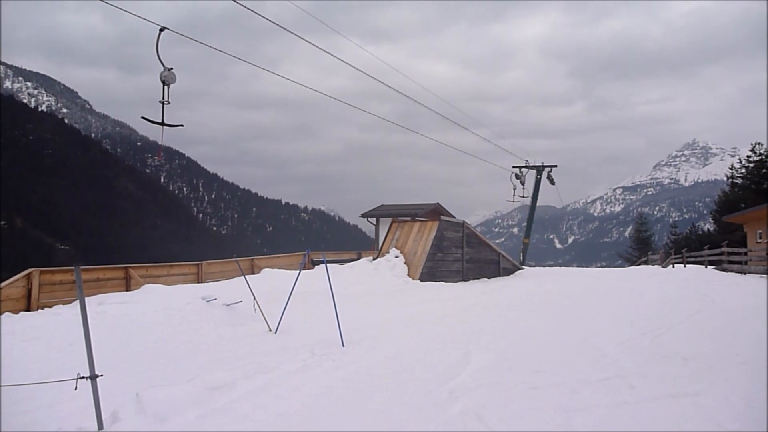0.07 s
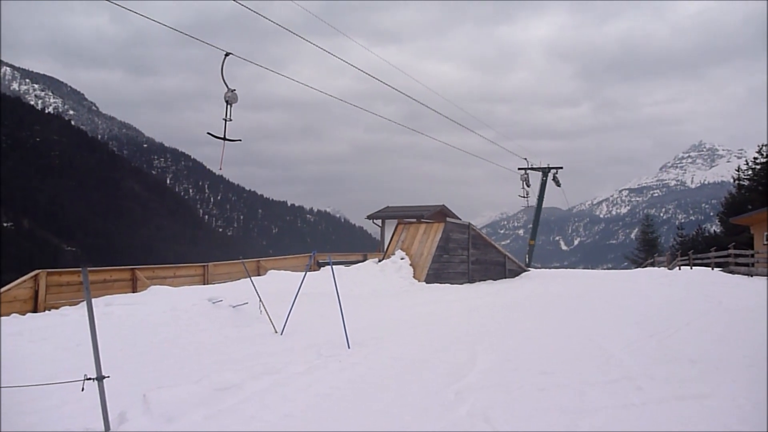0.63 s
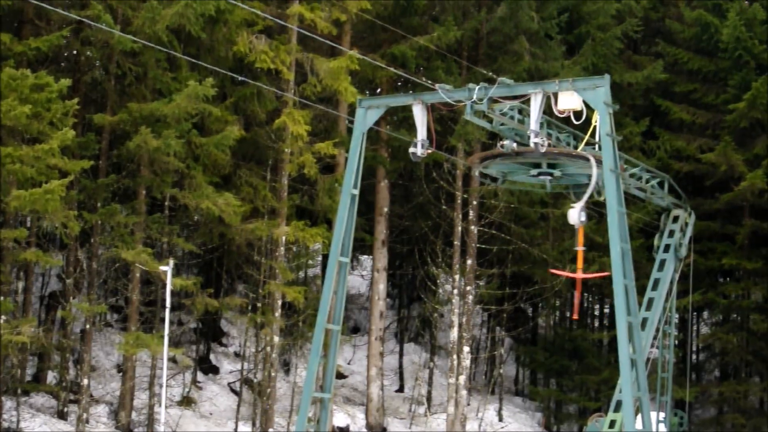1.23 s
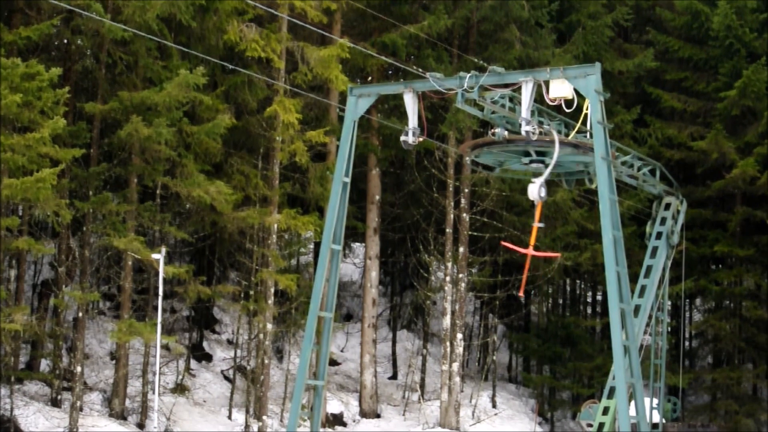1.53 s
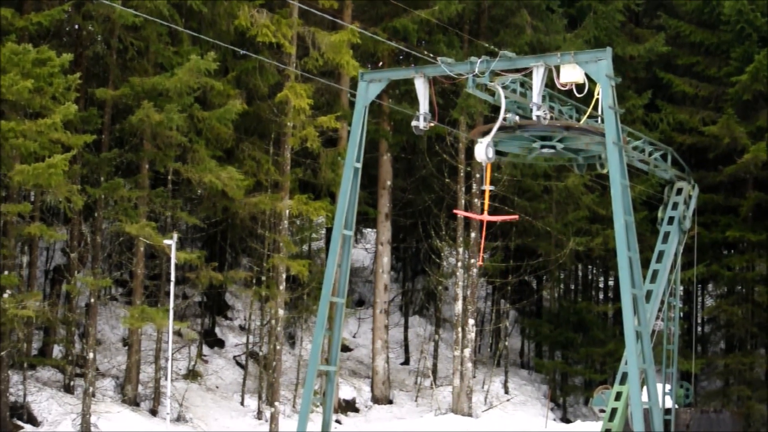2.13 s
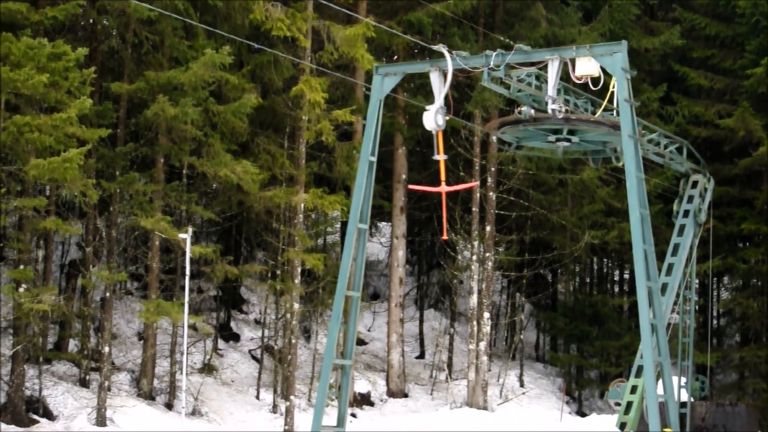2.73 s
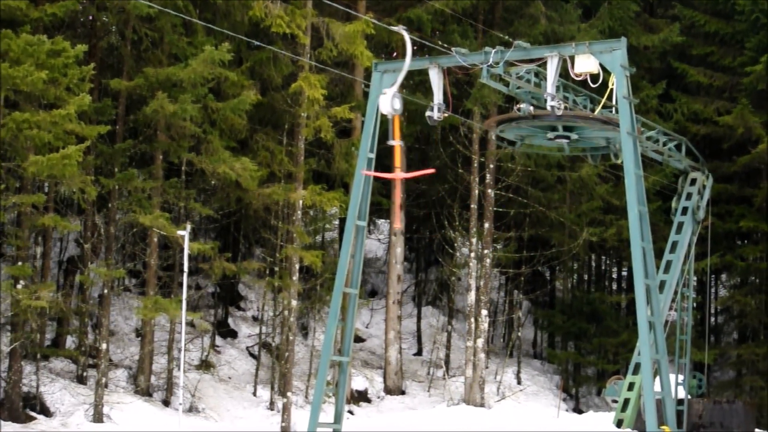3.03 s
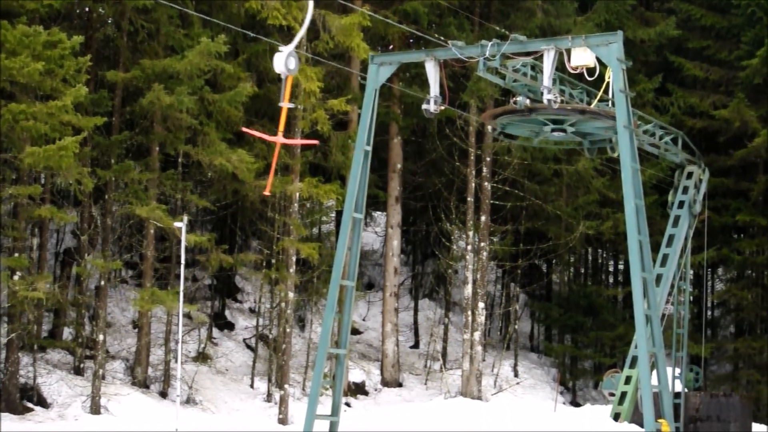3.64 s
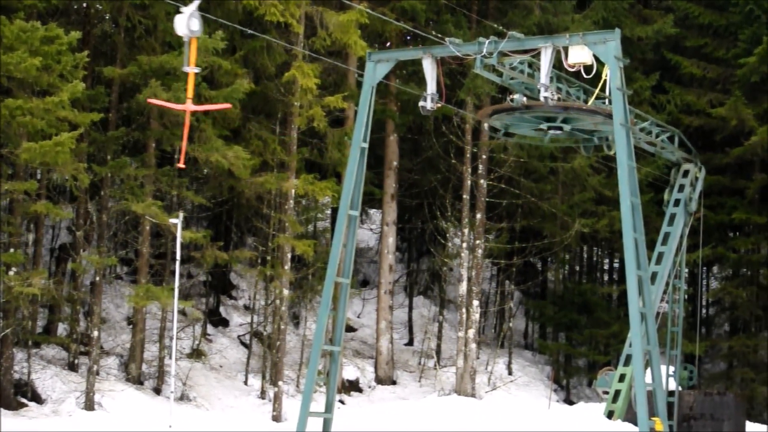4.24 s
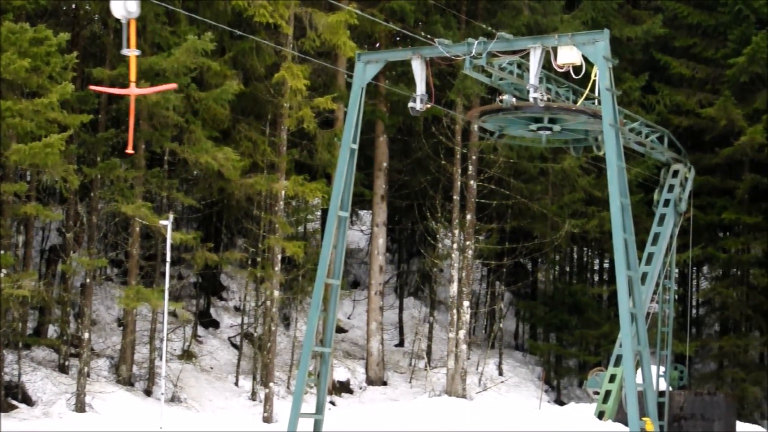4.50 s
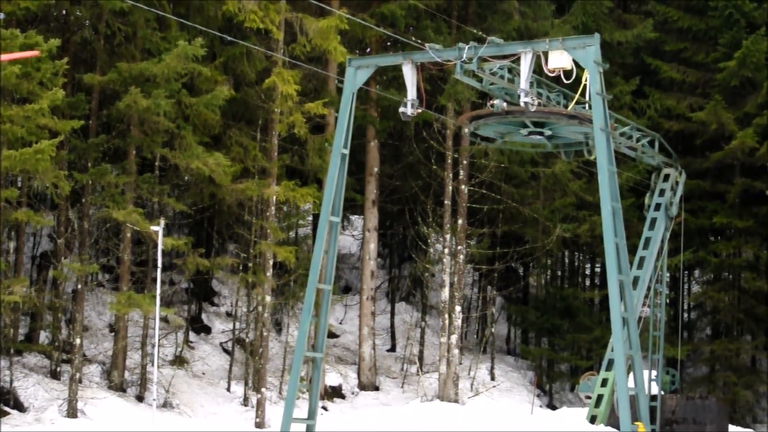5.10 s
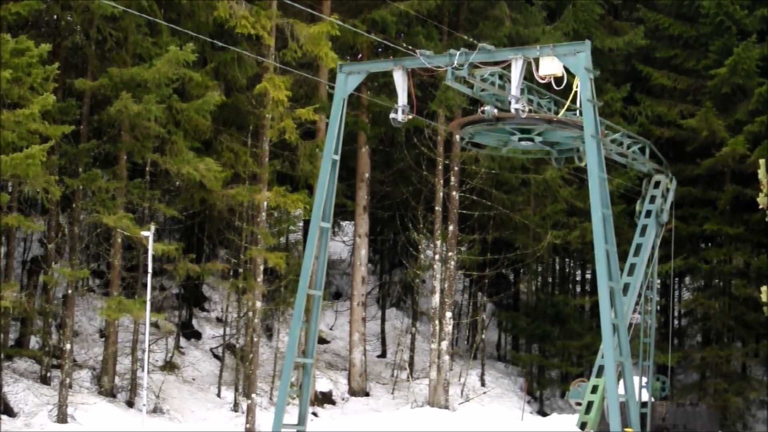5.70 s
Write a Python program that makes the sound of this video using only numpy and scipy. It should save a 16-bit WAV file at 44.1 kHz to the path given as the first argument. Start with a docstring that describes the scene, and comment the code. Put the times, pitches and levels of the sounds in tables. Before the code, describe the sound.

Outdoors on a snowy slope, a drag lift hanger clatters and clinks over a tower's pulleys in a steady hiss. The sound cuts out, two faint clicks follow, and the rumble of the return station fades in. A grip snaps in, the steel frame booms, and the hanger rattles round the wheel. It ticks away as the rumble eases, and a small forest bird gives thin whistles.

```python
"""A drag lift on a snowy slope. First, in a steady hiss, a hanger clatters over the sheaves of a tower,
its grip clinking on bare steel. The sound cuts out, clicks twice and fades in at the return station,
where wheel and rope rumble in the steel frame and a small bird whistles in the forest. The grip snaps
in, the frame booms, and the hanger rattles round the wheel with its arm ringing. It ticks away, the
rumble eases, and the bird whistles twice more."""
import sys
import numpy as np
from scipy import signal
from scipy.fft import rfft, irfft
from scipy.io import wavfile
from scipy.ndimage import uniform_filter1d

SR = 44100
rng = np.random.default_rng(int(sys.argv[2]) if len(sys.argv) > 2 else 0)


def unload_wav(signal):
    """Save mono or channel-first audio to the path in sys.argv[1] as 16-bit WAV at rate SR, clipped to [-1, 1]."""
    wavfile.write(
        sys.argv[1],
        SR,
        np.round(np.clip(np.atleast_2d(signal).T, -1, 1) * 32767).astype(np.int16),
    )


N = 262836
TIME = np.arange(N) / SR

# EQ curves for the slope's hiss and for wheel and rope: f/Hz, relative level/dB
HISS_EQ = [(50, -42), (100, -19), (170, -8.5), (300, 2), (800, 1.5), (1500, -4.5), (2500, -5), (3500, -6.5),
           (5000, -9.5), (7300, -12), (8000, -27)]
RUMBLE_EQ = [(25, -31), (45, -26.5), (62, -14.5), (90, -20.5), (125, -12), (200, -8), (300, -1), (450, 2),
             (620, -3), (800, -2), (1100, -8.5), (1500, -20), (2500, -30.5), (5000, -40)]
SCRAPE_EQ = [(700, 1.5), (1400, 4), (2000, 2.5), (2700, 2), (3200, -1.5), (4200, -2.3), (5200, -7.3),
             (5800, -51)]
# EQ curves for the body and the attack of the hits: f/Hz, relative level/dB
TOWER_THUD_EQ = [(120, -22), (250, -10), (420, -1.5), (850, -8.5), (1200, -5.5), (1700, -26.5),
                 (3000, -28.5)]
TOWER_CRACK_EQ = [(700, -14), (1700, -4.5), (2500, 2), (3000, -2), (3600, 1.5), (4700, -6), (6200, -11),
                  (7800, -31.5)]
STATION_THUD_EQ = [(100, -23), (200, -11), (350, -3.5), (850, 1), (1200, -3.5), (1800, -16.5), (3000, -36)]
STATION_CRACK_EQ = [(700, -3), (1500, -2), (2300, 6), (3100, -2.5), (3700, -3), (4500, -5.5), (5600, -25)]
SNAP_EQ = [(300, -3), (700, 3), (2000, -0.5), (3500, 0.5), (5000, 0), (6000, -21.5)]
# resonances of station frame, tower and hanger arm: f/Hz, bandwidth/Hz, gain/dB
FRAME_RESONANCES = [(158, 7.4, -16.5), (173.3, 11, -7), (221, 11, -7), (337.5, 0.87, 2.5), (359, 1.3, 4),
                    (400.6, 5.4, 0.5), (417.1, 5.7, 3.5), (512.8, 10, 4), (547, 11, 3.5), (750, 7.3, -14.5)]
TOWER_RESONANCES = [(525, 40, -3.5), (805, 100, 4), (1810, 55, 0), (2460, 31, -17), (2766, 51, 3.5)]
ARM_RESONANCES = [(324, 100, 1), (754, 93, 1), (2003, 44, -1), (2280, 44, 0.5), (2890, 79, -0.5),
                  (3550, 83, -1), (3700, 40, 1.5), (4170, 68, -1.5)]
# ring-out of the struck grip, sheaves, hanger arm and frame: f/Hz, relative level/dB, t60/s
GRIP_PARTIALS = [(1818, -4.5, 0.06), (2510, -9.5, 0.04), (2750, -8, 0.07), (3500, -16, 0.09),
                 (4240, -13.5, 0.094), (4445, -13, 0.078), (4655, -14, 0.15), (5508, -7, 0.18),
                 (5893, -14.5, 0.17), (6040, -10.5, 0.04), (6200, -4.5, 0.04)]
SHEAVE_PARTIALS = [(534, 2.5, 0.055), (792, 0.5, 0.05), (1155, -8, 0.045)]
ARM_PARTIALS = [(2070, -2, 0.06), (2300, 0.5, 0.07), (2750, -3, 0.029), (2885, -3, 0.055),
                (3470, -2, 0.053), (3830, -3.5, 0.065), (4220, -4.5, 0.05), (4670, -13, 0.068)]
BOOM_PARTIALS = [(346, -1, .13), (420, -7, .1), (780, -5, 0.055)]

# the drive's two notes: f/Hz, base level against the rumble/dB, list of swells t/s
DRIVE_NOTES = [(287.2, -16.5, (2.55, 3.1, 3.5, 4.1, 4.4, 5.85)),
               (319.8, -13.5, (2.35, 2.85, 3.5, 4.55, 5.0))]
# three whistles (rising, falling, rising), each a list of: t/s, f/Hz, level/dB, waver depth/Hz
BIRD_WHISTLES = [
    [(1.25, 3280, -70, 10), (1.325, 3330, -74, 10), (1.362, 3670, -61, 13), (1.45, 3830, -58, 30),
     (1.47, 3870, -65, 53), (1.545, 3980, -59.5, 50)],
    [(3.335, 4700, -66, 20), (3.346, 4920, -54.5, 15), (3.41, 4740, -55, 16), (3.475, 4590, -49.5, 18),
     (3.5, 4550, -52, 26), (3.513, 4420, -57, 230), (3.523, 4750, -57, 230), (3.531, 4340, -50, 26),
     (3.553, 4430, -49.5, 25), (3.585, 4150, -53, 54), (3.612, 4120, -55, 160)],
    [(4.705, 3300, -65, 9), (4.805, 3400, -64, 15), (4.82, 3500, -66, 130), (4.845, 3670, -59, 18),
     (4.885, 3700, -54, 14), (4.91, 3740, -59, 45), (4.93, 3870, -56, 70), (4.968, 3980, -58.5, 55),
     (4.992, 3980, -51, 60), (5.02, 3980, -57, 75), (5.055, 4000, -55.5, 40), (5.09, 4000, -69, 40)],
]
# a lower voice that splits off under the last whistle: t/s, f/Hz, level/dB, waver depth/Hz
BIRD_UNDERVOICE = [(4.9, 3680, -64, 40), (4.935, 3700, -63, 60), (4.96, 3780, -66, 90),
                   (5.0, 3770, -66, 90)]
# a dull pop and a light two-part tick in the hush: t/s, level/dB, f/Hz, t60/s
HUSH_CLICKS = [(1.1655, -38.5, 45, 0.0089), (1.227, -45.5, 1220, 0.0094), (1.23, -52.5, 636, 0.031)]
# the grip strikes bare steel: t/s, level/dB, hardness/dB
GRIP_HITS = [(0.511, -32.5, 0), (0.5557, -34.5, 1.5), (0.681, -31, 1), (0.9083, -30, -1.5),
             (0.945, -38, -6.5), (1.0255, -38, -17)]
# the hanger bumps over the sheaves: t/s, then sends: tick/dB, thud/dB, crack/dB, ring/dB
TOWER_HITS = [(0.351, -29, -42, -39.5, -48), (0.359, -26, -40, -43, -38.5), (0.372, -37, -43.5, -49, -35),
              (0.405, -24.5, -47, -42, -54), (0.443, -19.5, -48.5, -44, -58), (0.458, -27, -34, -34.5, -37),
              (0.474, -23.5, -39.5, -40, -36), (0.513, -16, -37.5, -40, -49),
              (0.555, -20.5, -39.5, -36.5, -52), (0.581, -27.5, -38.5, -42, -42),
              (0.6, -31.5, -36.5, -41, -36.5), (0.681, -21.5, -36.5, -42.5, -51),
              (0.702, -21.5, -35, -38, -32), (0.796, -29, -37.5, -37, -43), (0.814, -26, -46.5, -47, -30.5),
              (0.864, -24, -41, -46.5, -51), (0.907, -18, -37.5, -37, -50), (0.922, -31, -37, -38, -45),
              (0.94, -27.5, -37, -39.5, -43.5), (1.015, -23.5, -42.5, -41, -54),
              (1.027, -23.5, -38.5, -43, -54), (1.045, -30, -37, -39.5, -49)]
# the grip snaps against the wheel as it enters: t/s, level/dB, t60/s
GRIP_SNAP = (1.8036, -35, 0.021)
# the hanger clanks round the wheel, mostly in pairs, then ticks as it leaves:
# t/s, then sends: tick/dB, thud/dB, crack/dB, ring/dB, and ring tilt/(dB per octave)
STATION_HITS = [(1.775, -39, -38, -45.5, -54, 0), (1.826, -32.5, -35.5, -44.5, -56, 0),
                (1.888, -29.5, -44, -44.5, -49, 0), (1.913, -33.5, -38, -41.5, -45.5, 5),
                (1.945, -44.5, -43.5, -43, -51, 2), (2, -38.5, -40.5, -47.5, -53, -4),
                (2.0457, -37, -37.5, -45.5, -49, 0), (2.115, -34.5, -33.5, -43, -50, -4),
                (2.1423, -36.5, -35, -41.5, -48, -3), (2.154, -33, -40.5, -45, -55, 4),
                (2.2254, -40, -36, -44.5, -54, 0), (2.2565, -26.5, -38.5, -47.5, -42.5, -4),
                (2.342, -28, -32.5, -41, -43, 4.5), (2.353, -29, -36.5, -47, -48, -8),
                (2.3747, -30, -35.5, -43, -44, -3), (2.458, -38, -33.5, -43.5, -51, -4),
                (2.496, -30.5, -36, -47, -44, -10.5), (2.5737, -40.5, -33, -46.5, -56, 0),
                (2.603, -28.5, -32, -41, -39.5, 4), (2.744, -43.5, -42.5, -51, -57, 0),
                (2.9591, -37.5, -45, -50, -54, 4), (3.0114, -40, -48, -56, -59, 1),
                (3.1825, -41, -44.5, -54, -51.5, 3), (3.4443, -41.5, -40, -48, -53, -1),
                (3.457, -39.5, -45, -51.5, -52, 0), (3.635, -38.5, -42, -52, -51.5, 7),
                (3.7997, -31, -42, -56, -57, -8.5), (3.928, -33.5, -52, -53, -54, 4),
                (4.188, -36, -47, -53, -64, 0)]


def from_db(db):
    """Decibels to gain."""
    return 10 ** (np.asarray(db) / 20)


def unit_rms(x):
    """Normalise to rms 1."""
    return x / np.sqrt(np.mean(x ** 2) + 1e-20)


def drift(rate_hz):
    """Smooth random modulator, rms 1."""
    hz = np.fft.rfftfreq(N, 1 / SR)
    return unit_rms(irfft(rfft(rng.standard_normal(N)) / (1 + (hz / rate_hz) ** 2), N))


def tone(hz):
    """A sine that follows a pitch curve."""
    return np.sin(2 * np.pi * np.cumsum(hz) / SR)


def equalise(x, curve):
    """Colour a white source with an EQ curve, keeping its power."""
    hz, db = np.transpose(curve)
    log_hz = np.log(np.fft.rfftfreq(N, 1 / SR) + 1)
    gain = from_db(np.interp(log_hz, np.log(hz), db, left=-60, right=-60))
    return irfft(rfft(x) * unit_rms(gain), N)


def low_pass(x, hz):
    """Steep treble cut."""
    return signal.sosfilt(signal.ellip(8, .3, 70, hz, fs=SR, output="sos"), x)


def grains(per_s, spread_db):
    """Grit: tiny random contacts of uneven size, rms 1."""
    sizes = from_db(spread_db * np.clip(rng.standard_normal(N), -2, 2)) * rng.choice([-1, 1], N)
    return unit_rms(sizes * (rng.random(N) < per_s / SR))


def resonate(x, resonances):
    """Steelwork as a bank of parallel band-passes."""
    out = np.zeros(N)
    for hz, width, db in resonances:
        r = np.exp(-np.pi * width / SR)
        poles = [1, -2 * r * np.cos(2 * np.pi * hz / SR), r * r]
        out += from_db(db) * (1 - r * r) / 2 * signal.lfilter([1, 0, -1], poles, x + 1e-18)
    return out


def hit_envelope(times, levels_db, t60, attack_s):
    """Quick attack and exponential tail; overlapping hits add in energy."""
    energy = np.zeros(N)
    energy[np.round(np.asarray(times) * SR).astype(int)] = from_db(levels_db) ** 2
    tails = signal.lfilter([1], [1, -from_db(-60 / (t60 * SR)) ** 2], energy + 1e-24)
    r = np.exp(-1 / (attack_s * SR))
    return np.sqrt(signal.lfilter([1 - r], [1, -r], tails))


def knocks(hits, thud_eq, crack_eq, trims_db, t60s, chatter_per_s):
    """Sharp tick, thud of the steelwork, crack of chattering loose parts; trims and t60s in that order."""
    times, tick_db, thud_db, crack_db, *_ = np.transpose(hits)
    tick = hit_envelope(times, tick_db + trims_db[0], t60s[0], attack_s=0.00032)
    thud = hit_envelope(times, thud_db + trims_db[1], t60s[1], attack_s=0.01)
    crack = hit_envelope(times, crack_db + trims_db[2], t60s[2], attack_s=0.003)
    tick *= rng.standard_normal(N)
    crack *= grains(chatter_per_s, spread_db=2.5)
    thud *= rng.standard_normal(N)
    return equalise(tick + crack, crack_eq) + equalise(thud, thud_eq)


def ring_out(times, levels_db, partials, spread_db, detune, attack_s, tilts_db=0):
    """Struck steel rings; each hit lands on another spot, so the partials vary in level and pitch."""
    out = np.zeros(N)
    age = TIME[:SR // 4]
    hz, db, t60 = np.transpose(partials)[:, :, None]
    octaves = np.log2(hz) - np.log2(hz).mean()
    envelopes = from_db(db - 60 * age / t60) * (1 - np.exp(-age / attack_s))
    for s, level_db, tilt_db in np.broadcast(times, levels_db, tilts_db):
        strength, pitch, phase = rng.standard_normal((3, len(partials), 1))
        sines = np.sin(2 * np.pi * (hz * (1 + detune * pitch) * age + phase))
        # each hit rings brighter or duller by its own tilt
        gains = from_db(level_db + tilt_db * octaves + spread_db * strength)
        start = round(s * SR)
        out[start:start + len(age)] += np.sum(gains * envelopes * sines, axis=0)
    return out


def slope_hiss():
    """A steady bed of hiss that breathes slightly."""
    return from_db(-46.5 + 1.1 * drift(5.2)) * equalise(rng.standard_normal(N), HISS_EQ)


def bird(waver_hz=75, flutter_db=1.9):
    """Thin whistles that glide, flutter and break into a waver, with six echoes from the trees."""
    song = np.zeros(N)
    waver = 0.62 * tone(waver_hz + 12 * drift(23)) + 0.4 * drift(200)
    flutter = from_db(-0.5 + flutter_db * drift(35))
    for whistle in BIRD_WHISTLES + [BIRD_UNDERVOICE]:
        times, *curves = np.transpose(whistle)
        hz, db, depth_hz = (np.interp(TIME, times, curve) for curve in curves)
        gate = uniform_filter1d(1. * ((TIME > times[0]) & (TIME < times[-1])), size=300)
        song += gate * flutter * from_db(db) * tone(hz + depth_hz * waver)
    delays = (rng.uniform(0.01, 0.049, 6) * SR).astype(int)
    return song + from_db(-26) * sum(np.roll(song, delay) for delay in delays)


def clicks():
    """A dull pop and a light tick: hard onsets that ring out at once."""
    out = np.zeros(N)
    age = TIME[:SR // 20]
    for s, db, hz, t60 in HUSH_CLICKS:
        start = round(s * SR)
        out[start:start + len(age)] += from_db(db - 60 * age / t60) * np.cos(2 * np.pi * hz * age)
    return out


def drive_hum(swell_db=8.5, swell_width_s=0.1):
    """The drive hums unevenly on two notes that swell by turns."""
    hum = np.zeros(N)
    for hz, db, times in DRIVE_NOTES:
        swells = sum(np.exp(-.5 * ((TIME - s) / swell_width_s) ** 2) for s in times)
        hum += from_db(db + swell_db * swells + 2 * drift(5)) * tone(hz + 1.9 * drift(5.1))
    return hum


def wheel(loading_s=0.013, hanger_leaves_s=2.44, easing_s=0.83):
    """Rope and wheel roll, scrape and set the frame droning over the hum; all grow with the load."""
    rolling = equalise(grains(per_s=5000, spread_db=2.5), RUMBLE_EQ) * from_db(-3 + 0.46 * drift(16))
    drone = from_db(-7.5) * unit_rms(resonate(rng.standard_normal(N), FRAME_RESONANCES))
    rumble = rolling + drone + drive_hum()
    scrape = equalise(grains(per_s=4500, spread_db=4), SCRAPE_EQ) * from_db(1.1 * drift(13))
    # the wheel runs lightly until the grip snaps in, and eases off once the hanger has left
    idle_db = -8.5 * np.clip((GRIP_SNAP[0] - TIME) / loading_s, 0, 1)
    easing = np.exp(-np.maximum(TIME - hanger_leaves_s, 0) / easing_s)
    rumble *= from_db(-42.5 + idle_db + 1.5 * easing)
    scrape *= from_db(-59 + idle_db + 5 * easing)
    return rumble + scrape


def grip_clinks(screech_hz=5480, slide_delay_s=0.011, slide_width_s=0.0051):
    """The grip rings at each hit, then gives a tiny rough screech as steel slides on steel."""
    ring, slide = np.zeros((2, N))
    age = TIME[:SR // 3]
    for s, level_db, hardness_db in GRIP_HITS:
        start = round(s * SR)
        slide += from_db(level_db - 4) * np.exp(-.5 * ((TIME - s - slide_delay_s) / slide_width_s) ** 2)
        for k, (hz, db, t60) in enumerate(GRIP_PARTIALS):
            # soft hits barely wake the short-lived partials
            onset_db = level_db + db + hardness_db * (t60 < .16) + rng.normal(0, 2.6)
            envelope = from_db(onset_db - 60 * age / t60)
            ring[start:start + len(age)] += (-1) ** k * envelope * np.sin(2 * np.pi * hz * age)
    return ring + slide * tone(screech_hz + 14 * drift(165))


def hanger_at_tower(low_cut_hz=130):
    """The hanger knocks and clinks over the ringing sheaves, and the tower resonates; thin in the bass."""
    hits = knocks(TOWER_HITS, TOWER_THUD_EQ, TOWER_CRACK_EQ,
                  trims_db=(-11.5, -2, -3), t60s=(0.018, 0.11, 0.28), chatter_per_s=7000)
    times, *_, ring_db = np.transpose(TOWER_HITS)
    sheaves = ring_out(times, ring_db, SHEAVE_PARTIALS, spread_db=2, detune=0.025, attack_s=0.0043)
    tower = from_db(0.5) * resonate(hits, TOWER_RESONANCES)
    steel = from_db(-2) * hits + tower + sheaves + grip_clinks()
    return signal.sosfilt(signal.butter(2, low_cut_hz, "high", fs=SR, output="sos"), steel)


def hanger_at_station(boom_s=1.827, boom_db=-34.5):
    """The grip snaps in, the frame booms under the weight, and each knock sets the steel arm ringing."""
    hits = knocks(STATION_HITS, STATION_THUD_EQ, STATION_CRACK_EQ,
                  trims_db=(-9, -6, -3.5), t60s=(0.011, 0.14, 0.062), chatter_per_s=1700)
    times, *_, ring_db, tilts_db = np.transpose(STATION_HITS)
    ring = ring_out(times, ring_db, ARM_PARTIALS,
                    spread_db=1.5, detune=0.0047, attack_s=0.0016, tilts_db=tilts_db)
    arm = from_db(-1) * resonate(hits, ARM_RESONANCES) + from_db(-3) * ring
    boom = ring_out([boom_s], [boom_db], BOOM_PARTIALS, spread_db=2, detune=0.003, attack_s=0.0018)
    snap_s, snap_db, snap_t60 = GRIP_SNAP
    snap = hit_envelope([snap_s], [snap_db], snap_t60, attack_s=0.00035) * rng.standard_normal(N)
    return equalise(snap, SNAP_EQ) + boom + from_db(-1.5) * hits + arm


def scene(cut_s=1.07, fade_start_s=1.17, fade_end_s=1.664, fade_db_per_s=54.5):
    """The tower until the cut, two clicks in the hush, then the duller station fading in."""
    notch = signal.iirnotch(2880, Q=8.7, fs=SR)  # hollows out one narrow band
    tower = signal.lfilter(*notch, slope_hiss() + hanger_at_tower())
    # an abrupt drop, then a tail of a few hundredths of a second
    tower *= np.where(TIME < cut_s, 1, from_db(-20.5 - 1340 * np.abs(TIME - cut_s)))
    fade_in = from_db(fade_db_per_s * np.minimum(TIME - fade_end_s, 0)) * (TIME > fade_start_s)
    station = (bird() + wheel() + hanger_at_station()) * fade_in
    hush = from_db(-99) * rng.standard_normal(N)
    return (hush + tower + low_pass(station + clicks(), hz=5400))[None]


def record(dry):
    """A steep high cut takes the air off the whole mix."""
    return low_pass(dry, hz=7600)


dry = scene()
out = record(dry)
unload_wav(out)
```